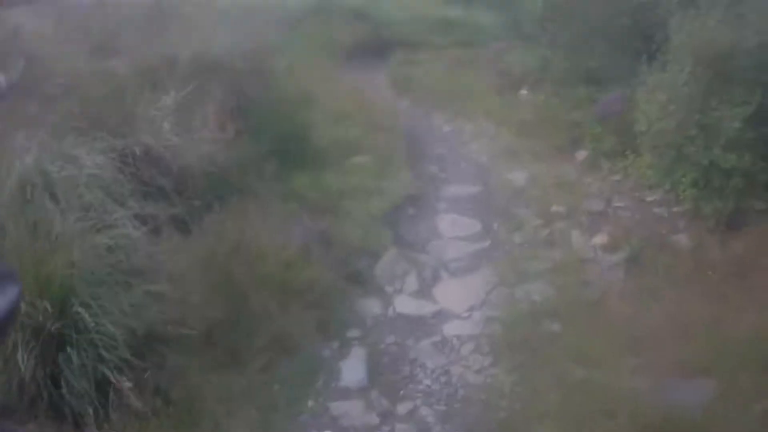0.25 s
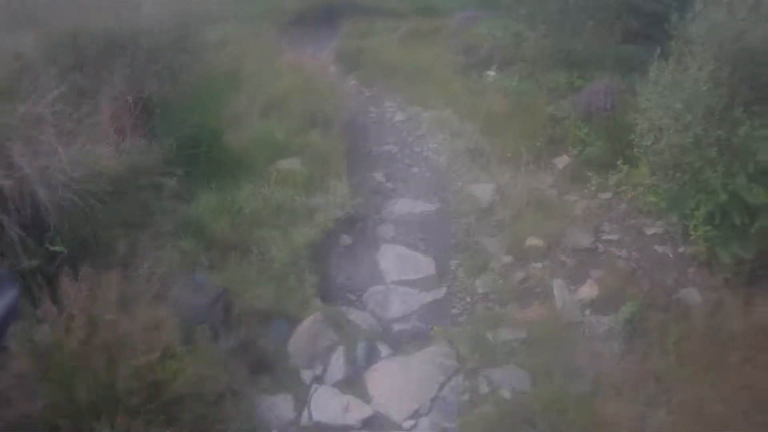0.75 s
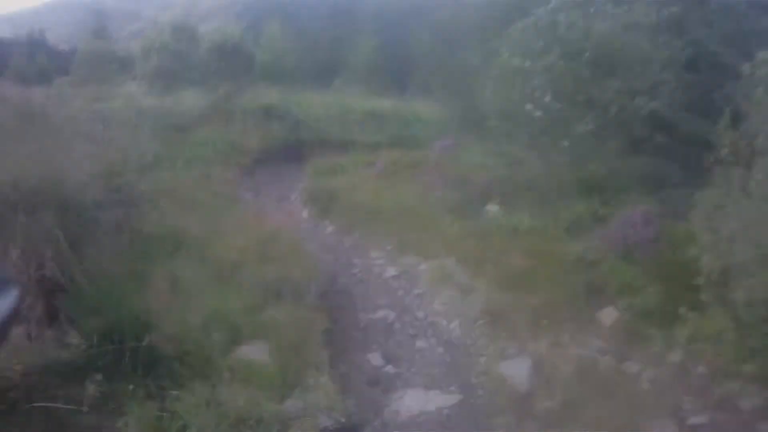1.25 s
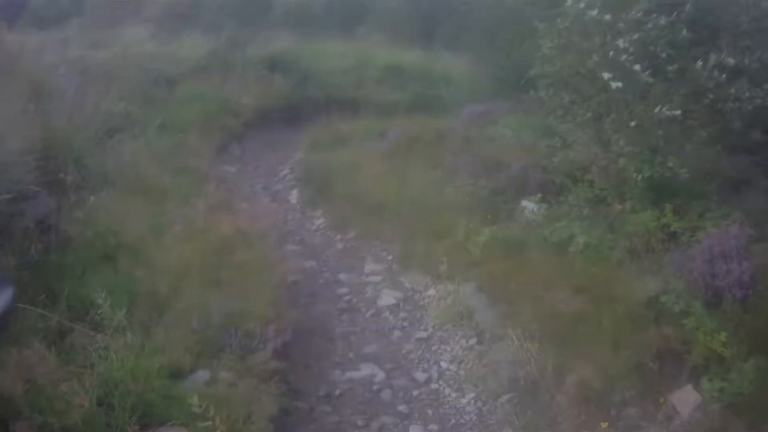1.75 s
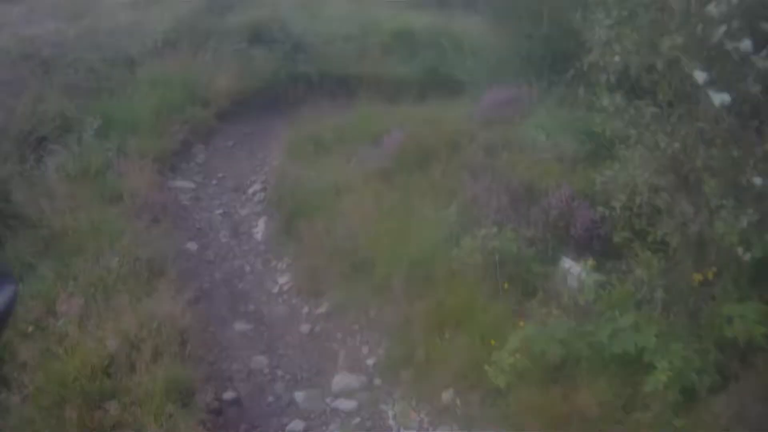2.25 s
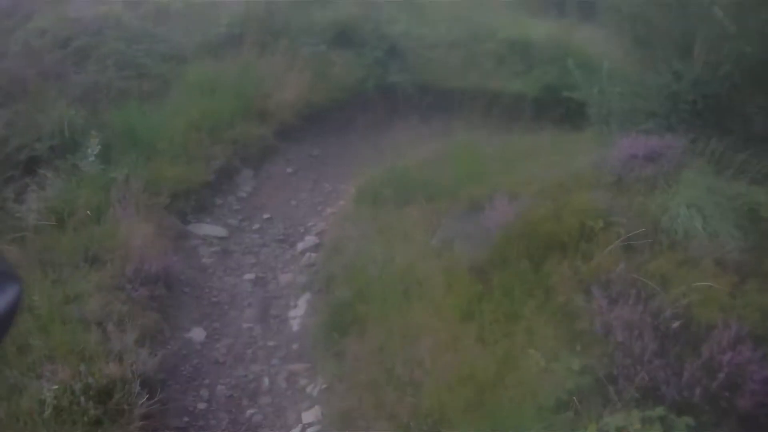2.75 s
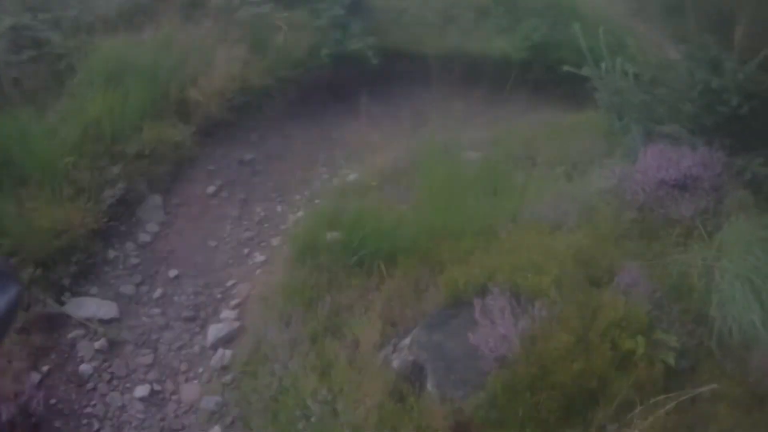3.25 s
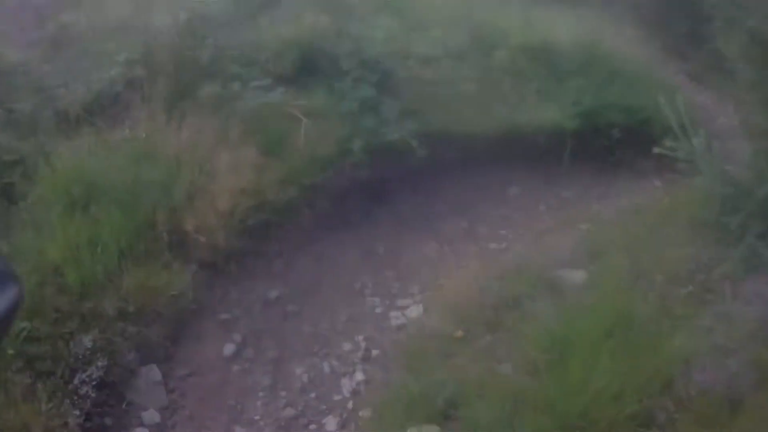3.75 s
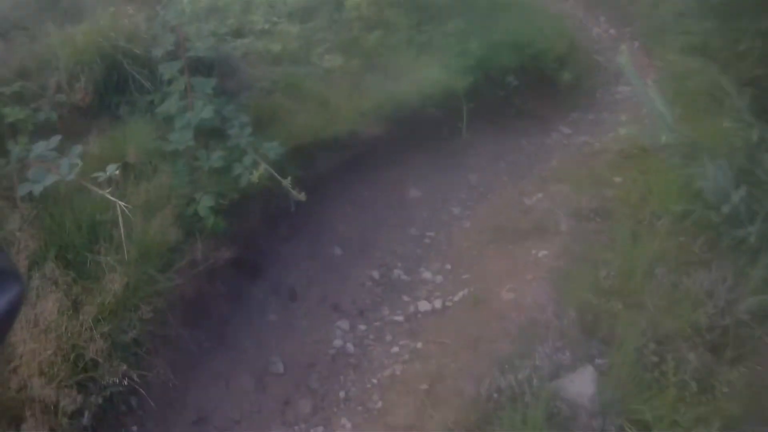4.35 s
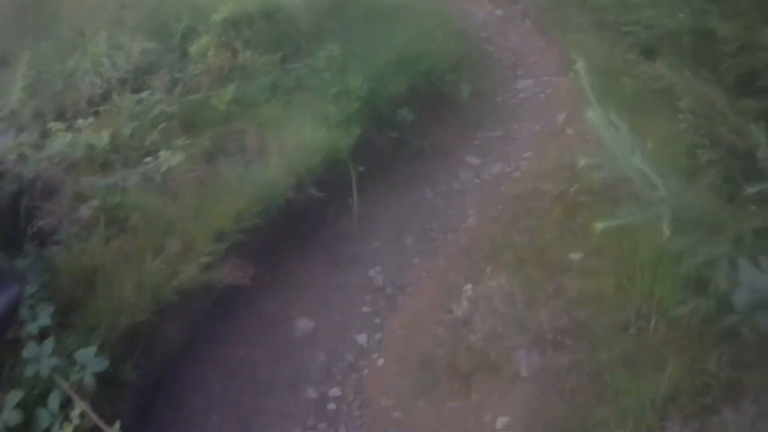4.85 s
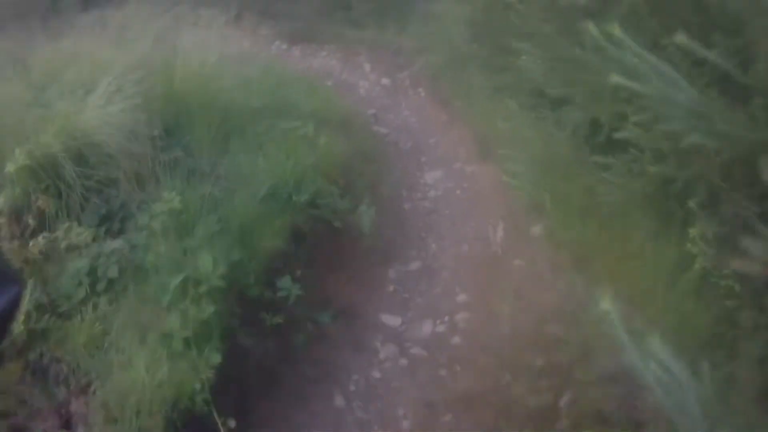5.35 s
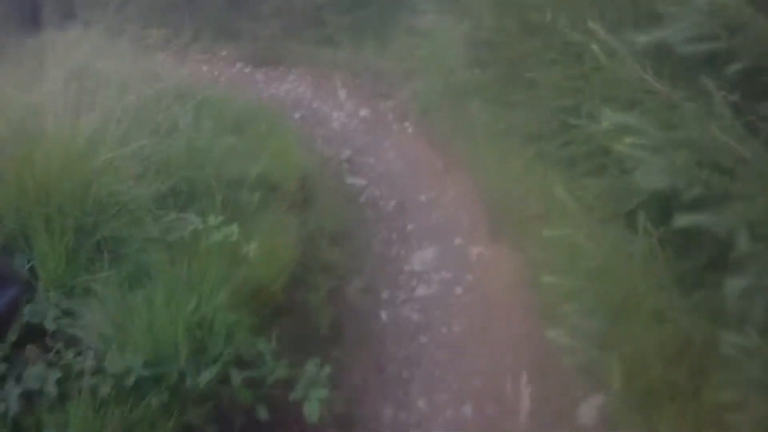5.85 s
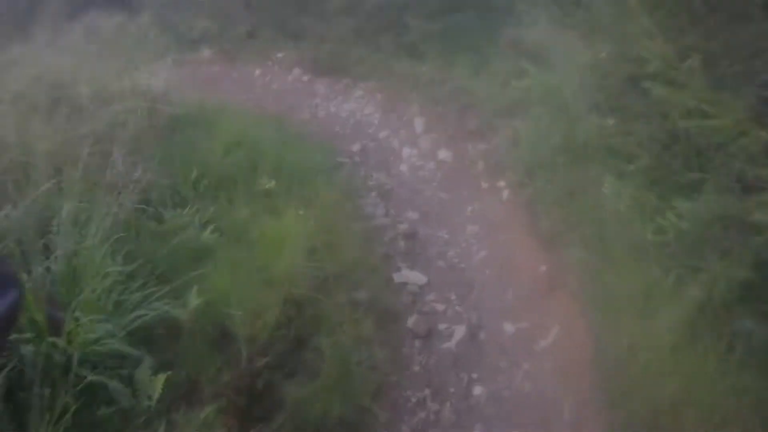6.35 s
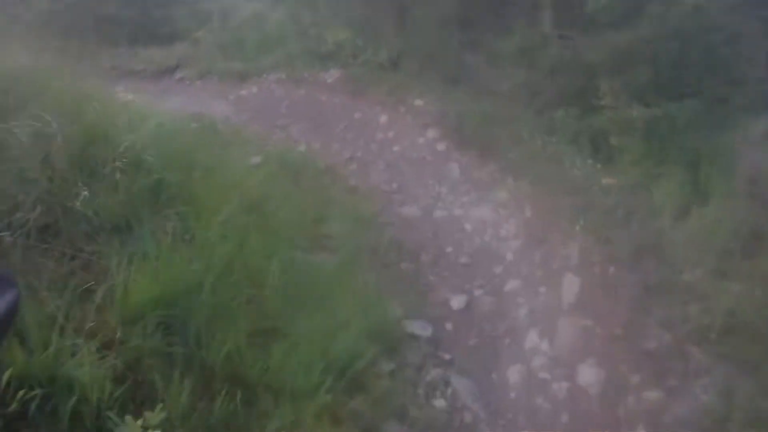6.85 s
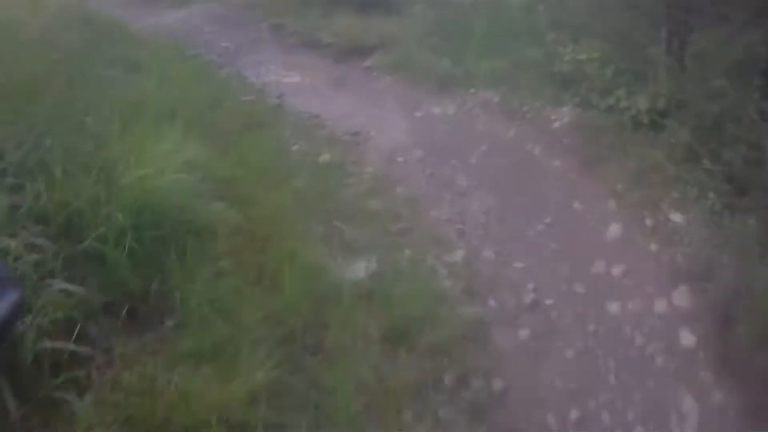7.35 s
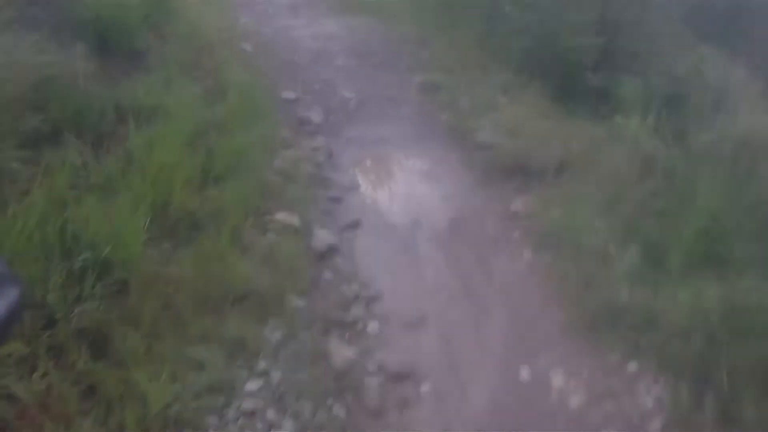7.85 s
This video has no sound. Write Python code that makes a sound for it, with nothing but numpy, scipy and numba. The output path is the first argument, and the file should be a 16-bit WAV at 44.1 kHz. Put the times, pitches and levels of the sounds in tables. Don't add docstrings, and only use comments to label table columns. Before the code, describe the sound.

Riding down a rocky trail, heard on the rider: boxy tyre rumble, sharp stone clacks, and raspy honking brake squeals in three clusters.

```python
import sys
import numpy as np
from scipy import signal
from scipy.fft import rfft, irfft, next_fast_len
from scipy.io import wavfile
from scipy.ndimage import uniform_filter1d
from numba import njit

SR = 44100
rng = np.random.default_rng(int(sys.argv[2]) if len(sys.argv) > 2 else 0)


def wrap_up_sound(samples):
    columns = np.atleast_2d(samples).T
    tamed = np.clip(columns, -1, 1)
    steps = np.round(tamed * 32767).astype(np.int16)
    wavfile.write(sys.argv[1], SR, steps)


def level_to_linear(level):
    exponent = np.asarray(level, float) / 20
    return 10 ** exponent


N = 357033


@njit
def svf(x, hz, width):
    y, band, low = np.empty(len(x)), 0., 0.
    g, k = np.tan(np.pi * hz / SR), width / hz
    for i in range(len(x)):
        v = (band + g * (x[i] - low)) / (1 + g * (g + k))
        band, low, y[i] = 2 * v - band, low + 2 * g * v, k * v
    return y


def unit(x):
    return x / np.sqrt(np.mean(x ** 2))


def noise():
    return rng.standard_normal(N)


def walk(rate):
    hold = int(SR / rate)
    steps = np.repeat(rng.standard_normal(N // hold + 1), hold)
    return unit(uniform_filter1d(uniform_filter1d(steps, hold), hold)[:N])


def follow(points):
    s, *columns = np.transpose(points)
    curves = [np.interp(np.arange(N) / SR, s, column) for column in columns]
    return curves if len(curves) > 1 else curves[0]


def shape(points, hz):
    f, db = np.transpose(points)
    return np.interp(np.log(np.maximum(hz, 1)), np.log(f), db)


def colour(x, points):
    size = next_fast_len(N)
    hz = np.arange(size // 2 + 1) * SR / size
    inside = (hz > points[0][0]) & (hz < points[-1][0])
    return unit(irfft(rfft(x, size) * level_to_linear(shape(points, hz)) * inside, size)[:N])


def grains(rate, spread_db):
    hit, size, sign = rng.random((3, N))
    return (hit < rate / SR) * level_to_linear(-spread_db * np.log(size + 0.01)) * (sign - .5)


def held(rows, rise, fall=None):
    t = np.arange(N) / SR
    levels = []
    for row in rows:
        early, late = np.maximum(row[0] - t, 0), np.maximum(t - row[1], 0)
        levels.append(np.interp(t, row[:2], row[2:4]) - rise * early - (fall or row[4]) * late)
    return uniform_filter1d(np.max(levels, axis=0), size=120), np.argmax(levels, axis=0)


def dips(rows, half_s):
    t = np.arange(N) / SR
    return sum(db * np.maximum(1 - np.abs(t - s) / half_s, 0) for s, db in rows)


def fading(depth, rate):
    return (1 + depth * (walk(rate) + 1j * walk(rate))) / np.sqrt(1 + 2 * depth ** 2)


def mode(pitch, squeezes, octaves, wobble_hz):
    hz = follow(pitch)
    spin = np.exp(2j * np.pi * np.cumsum(hz + wobble_hz * walk(160)) / SR)
    swing = np.sqrt(2) * level_to_linear(held(squeezes, rise=254)[0])
    octave = np.sqrt(2) * level_to_linear(held(octaves, rise=449)[0])
    return hz, swing * spin, octave * spin ** 2 * fading(.6, 90)


# (time [s], pitch [Hz])
LOW_PITCH = [(0, 656.7), (.9, 654.6), (2.55, 654.7), (2.9, 648), (3.2, 650.6), (3.45, 652), (3.76, 661.4),
             (3.9, 662.4), (4.15, 647.6), (4.45, 650), (5.19, 654), (5.4, 651.7), (5.6, 651.4),
             (5.67, 661.5), (5.74, 684), (5.95, 693.6), (6.7, 660), (6.95, 658.5), (7.02, 691), (8.1, 717)]
HIGH_PITCH = [(0, 750), (.74, 758), (.86, 749), (.92, 756), (1.0, 757), (1.3, 754), (1.7, 757), (2.5, 752),
              (6.72, 759), (6.82, 739.5), (6.88, 713), (8.1, 723)]
# (full from [s], let go [s], level at first [dB], level at let-go [dB], dying rate [dB/s])
LOW_SQUEEZES = [(0.683, .7, -40, -41.5, 201), (0.868, 0.87, -37, -38, 330), (2.488, 2.578, -40, -40, 200),
                (2.616, 2.655, -32.5, -30, 70), (2.826, 2.86, -32.5, -31, 200),
                (2.923, 2.964, -32, -30.5, 200), (2.98, 3.06, -34, -40, 100),
                (3.112, 3.215, -36, -35.5, 100), (3.245, 3.394, -31.5, -33, 258),
                (3.5, 3.682, -54, -57, 200), (3.777, 3.82, -26.5, -25, 300), (3.86, 3.972, -29, -30.5, 197),
                (4.0, 4.196, -32.5, -30, 100), (4.2, 4.293, -31, -26.5, 60.5),
                (4.408, 4.454, -26, -27, 397), (4.48, 4.604, -31, -46, 150), (4.65, 4.82, -53, -59, 140),
                (5.144, 5.149, -33, -31.5, 500), (5.254, 5.293, -32.5, -33, 200),
                (5.365, 5.388, -28.5, -29, 200), (5.476, 5.62, -29, -34.5, 200),
                (5.671, 5.721, -25, -30, 500), (5.783, 5.967, -39.5, -52, 200),
                (6.77, 6.82, -33.5, -27, 260), (6.85, 6.946, -28.5, -25, 260), (6.93, 6.96, -29, -31, 900),
                (7.02, 7.098, -35, -43, 200)]
HIGH_SQUEEZES = [
    (0.636, 0.73, -44, -39, 300),
    (0.872, 0.886, -29, -29, 250),
    (0.962, 1.05, -28.5, -31, 200),
    (1.111, 1.134, -30.5, -32.5, 300),
    (1.185, 1.275, -29.5, -35, 400),
    (1.33, 1.348, -39, -40.5, 500),
    (1.62, 1.671, -36, -39.5, 250),
    (2.508, 2.519, -28.5, -30.5, 600),
    (6.787, 6.899, -30, -31.5, 600),
]
# (full from [s], let go [s], level at first [dB], level at let-go [dB], dying rate [dB/s])
LOW_OCTAVES = [(2.54, 2.67, -51.5, -40, 136), (2.798, 2.87, -46, -45, 150), (2.952, 3.4, -51.5, -58, 150),
               (3.785, 3.797, -44, -42, 147), (4.03, 4.2, -55.5, -53, 301), (4.301, 4.43, -61, -43.5, 251),
               (5.135, 5.461, -54.5, -42, 100), (5.492, 5.696, -45.5, -42, 163),
               (6.756, 6.78, -44, -48, 200), (6.823, 6.83, -28, -38, 200), (6.858, 6.903, -42, -38, 200),
               (6.93, 6.979, -45, -46, 600), (5.741, 5.83, -52, -75, 200)]
HIGH_OCTAVES = [
    (0.702, .71, -54, -67, 200),
    (0.872, 1.202, -50.5, -43, 79),
    (1.605, 1.7, -60, -67, 200),
    (2.5, 2.508, -57, -58, 300),
    (6.79, 6.898, -51, -44, 600),
]
# (time [s], depth [dB])
LOW_FADES = [(2.745, -14), (2.884, -15), (2.925, -5), (2.965, -6), (2.99, -6), (3.275, -5.5), (3.32, -5),
             (3.797, -11.5), (3.836, -12), (3.95, -4), (3.985, -13), (4.015, -16), (4.473, -11),
             (4.512, -8.5), (4.545, -13), (5.325, -5), (5.395, -9), (5.436, -10), (5.495, -7), (5.63, -8),
             (5.75, -9), (5.81, -12), (5.865, -8), (5.91, -11), (6.826, -10), (6.895, -5), (6.95, -11.5),
             (7.011, -10), (7.05, -3), (7.088, -10)]
HIGH_FADES = [
    (1.153, -2),
    (1.237, -5),
    (1.287, -8),
]
# (time [s], share [0-1])
STEERING = [(0, 1), (1.8, 1), (2.48, 0.17), (2.525, 0.02), (2.545, 0), (6.7, 0), (6.78, 0.1), (6.81, 0.7),
            (6.825, 0)]
# (time [s], roughness [0-1])
ROUGHNESS = [(1.5, .15), (2.5, .3), (3.1, .22), (3.75, .45), (4.0, .45), (4.06, .15), (4.45, .2),
             (5.25, .25), (5.33, .55), (5.5, .55), (5.58, .35), (5.65, .45), (5.68, .7), (5.73, .4),
             (6.8, .75), (6.9, .7), (6.96, .45)]
# (full from [s], slip [s], level at first [dB], level at slip [dB],
# lift of overtones away from the case whistle [dB])
GRABS = [(0.671, 0.69, -45.5, -43.5, -5), (0.864, 0.88, -34.5, -30.5, -5), (0.903, 1.14, -45, -43, 5.5),
         (1.165, 1.28, -40.5, -41, 2.5), (1.292, 1.326, -35, -40, -9), (1.353, 1.37, -58, -50.5, -9),
         (2.489, 2.64, -32.5, -27.5, -5), (2.6, 3.007, -31, -33, -2.5), (3.022, 3.306, -33, -37.5, -3.5),
         (3.336, 3.4, -48, -58, 0.5), (3.771, 3.78, -34, -38.5, -1.5), (3.82, 3.83, -27.5, -39.5, -5),
         (3.855, 3.89, -41, -41, -2), (3.936, 3.953, -63, -46, -4), (4.024, 4.095, -41, -32.5, -4),
         (4.068, 4.335, -34, -32, -5.5), (4.339, 4.43, -33, -44, -3), (5.12, 5.05, -62, -50, -5),
         (5.193, 5.32, -30, -27, -6), (5.31, 5.47, -32.5, -34, -4.5), (5.465, 5.5, -39, -37.5, -3),
         (5.489, 5.646, -34, -32.5, -2.5), (5.672, 5.65, -39, -41, 2), (5.7, 5.715, -48, -52, -6),
         (6.789, 6.795, -24, -26, -5), (6.805, 6.816, -27, -29, -4.5), (6.833, 6.873, -27, -27.5, -3),
         (6.912, 6.906, -33, -35, -2)]
# (time [s], depth [dB])
BUMPS = [
    (.97, -11),
    (1.035, -7),
    (2.662, -16.5),
    (2.838, -7),
]
# (from [s], to [s], rasp loss at first [dB], rasp loss at end [dB])
CLEAN_ROTOR = [
    (3.08, 3.33, 13, 11),
    (4.07, 4.33, 14, 11),
    (5.2, 5.28, 8, 15),
    (5.55, 5.64, 4, 3),
]
# (time [s], lift below the case whistle [dB], lift of the top [dB])
BAR_AIM = [(.87, 1.5, -3), (1.0, -0.5, -2), (1.2, 1, -0.5), (2.5, -3.5, 2), (2.62, -0.5, 0.5), (2.8, -1, 1),
           (2.95, -2, 2.5), (3.12, -8.5, 1.5), (3.25, 1.5, 0), (3.8, 0.5, -1), (4.05, 1.5, 0), (4.25, 0, 0),
           (4.4, 1, 0), (5.22, -1.5, 1.5), (5.4, 1, 2), (5.62, 0, 4), (6.8, -2, 0), (6.9, 2, -1)]
# (frequency [Hz], level [dB])
SLIP_COLOUR = [(1950, -7.5), (2270, -5), (2600, -4), (2850, 3.5), (3020, 2.5), (3250, -2), (3560, -12.5),
               (3900, -9.5), (4550, -17.5), (5200, -13), (5900, -19.5), (7000, -16.5), (8000, -26.5),
               (9500, -39), (12500, -51)]
# (frequency [Hz], level [dB])
RASP_COLOUR = [(900, -3.5), (1300, -14), (1750, 2.5), (2200, -9), (2600, -8.5), (2950, 11.5), (3500, -4.5),
               (5000, -9), (7000, -11), (10000, -29), (15000, -49)]


def brakes():
    rough = follow(ROUGHNESS)
    low_hz, low, low_octave = mode(LOW_PITCH, LOW_SQUEEZES, LOW_OCTAVES, wobble_hz=1.5 + 9 * rough ** 2)
    high_hz, high, high_octave = mode(HIGH_PITCH, HIGH_SQUEEZES, HIGH_OCTAVES, wobble_hz=1.5)

    steer = high * np.clip(follow(STEERING), 0, 1)
    pad = low + steer
    pointer = pad / (np.abs(pad) + 1e-12)
    reach = np.abs(low) + np.abs(steer) + 1e-9
    slip_hz = (np.abs(low) * low_hz + np.abs(steer) * high_hz + 1e-6) / reach
    beat = (np.abs(pad) / reach) ** .9

    bite_db, grab = held(GRABS, rise=2200, fall=600)
    bite_db = bite_db + dips(BUMPS, half_s=0.02)
    bright_db = uniform_filter1d(1. * np.array(GRABS)[grab, -1], size=800)
    below_db, top_db = follow(BAR_AIM)
    slips = 0
    for k in range(3, 20):
        hz = k * slip_hz
        db = shape(SLIP_COLOUR, hz[::64]).repeat(64)[:N]
        db = db + bright_db * np.minimum(np.abs(hz - 3150) / 1500, 1.6)
        db = db + below_db * (k < 5) + top_db * np.clip((hz - 5000) / 4000, 0, 1.5)
        near_case = .15 if k == 5 else 1
        shaking = fading((.1 + .5 * rough) * np.sqrt(near_case), 120)
        turning = fading(.55 * near_case, 32)
        overtone = pointer ** k * np.exp(.8j * k * k)
        slips = slips + level_to_linear(db) * (overtone * shaking * turning).real
    stutter = level_to_linear(5 * rough * walk(130))

    clean_db = np.maximum(held(CLEAN_ROTOR, rise=121, fall=121)[0], 0)
    rasp = colour(noise() * (1 + 0.26 * pointer.real), RASP_COLOUR)
    rasp = rasp * level_to_linear(-16.5 + 7 * rough - clean_db + 2 * walk(60))

    low_tone = low * level_to_linear(dips(LOW_FADES, half_s=0.0141))
    low_tone = low_tone * fading(1.1 * rough ** 2, 170) * fading(.25 * rough, 40)
    high_tone = high * level_to_linear(dips(HIGH_FADES, half_s=0.02)) * fading(.06 + .8 * rough ** 2, 90)
    tones = low_tone + high_tone + low_octave + high_octave
    return tones.real + level_to_linear(bite_db) * beat * stutter * (slips + rasp)


# (time [s], rock under the wheels [dB], loose grit [dB])
GROUND = [(0.0, -5.5, -3.5), (.55, 5.5, -3.5), (1.06, 10, 1.5), (1.5, 6.5, -0.5), (1.71, 2, -2),
          (2.34, 5, -2.5), (2.66, 2, 1.5), (3.07, 5, -1.5), (3.4, 0, -3), (3.48, -4.5, -1.5),
          (3.88, 0, -0.5), (4.9, -14, -4.5), (5.28, -7, -1), (5.5, -12, 2.5), (6.02, -9, -3),
          (6.11, -2, -1), (7.1, -0.5, 3.5), (8.1, -6, -0.6)]
# (frequency [Hz], level [dB per Hz])
RUMBLE_COLOUR = [(12, -63.5), (20, -18), (37, -4.5), (97, -2.5), (259, -3.5), (332, -6), (412, -6),
                 (520, -8), (680, -27.5), (1140, -120)]
# (frequency [Hz], level [dB])
TREAD_COLOUR = [(300, -16), (500, -4.5), (700, 5), (950, -6), (1200, -16), (1600, -16.5)]
# (frequency [Hz], level [dB per Hz])
GRIT_COLOUR = [(710, -39), (1200, -16), (1340, -14), (1410, -12.5), (1650, 3), (1980, 0), (2120, -4),
               (2860, -0.5), (5370, -10), (6580, -5.5), (7480, -13.5), (11400, -15.5), (15500, -21.5)]
# (from [s], to [s], lift at first [dB], lift at end [dB])
STONE_BEDS = [
    (6.68, 6.76, -5, 7),
    (7.0, 7.25, 7, 2),
    (7.32, 7.38, 4, 8.5),
    (7.535, 7.64, 10.5, 14.5),
    (7.95, 8.04, 7, 13.5),
]


def rolling():
    rock, loose = follow(GROUND)
    grit_db = -62 + loose
    tread_db = -52 + 0.35 * rock + loose
    rumble = colour(noise(), RUMBLE_COLOUR) * level_to_linear(-56 + rock + 2.5 * walk(18))
    tread = colour(noise() + 1.2 * grains(340, 2.1), TREAD_COLOUR) * level_to_linear(tread_db + 2.7 * walk(30))
    grit = colour(noise() + 8. * grains(300, 2.2), GRIT_COLOUR) * level_to_linear(grit_db + 1.2 * walk(60))
    bed_db = np.maximum(held(STONE_BEDS, rise=300, fall=300)[0], 0)
    patches = level_to_linear(4.0 * walk(70) + bed_db)
    crunch = unit(svf(noise() + 6. * grains(440, 6.4), 2900.0, 450.))
    return rumble + tread + grit + crunch * level_to_linear(grit_db - 4) * patches


# (time [s], clack level [dB], tick over it [dB], thud over it [dB], fizz over it [dB])
STONES = [(0.348, -28, -5, -3.5, -5), (0.3547, -22.5, 4, -11, -11), (0.358, -28, 10, -4, 13),
          (1.05, -35, 6, -7, 13), (1.153, -23, 6, -10, 8), (0.464, -44, -9, -15, -15),
          (1.626, -44, 4.5, -12, 5), (1.796, -45, 2, -14, 6), (2.047, -26, 7, -9, -10),
          (2.127, -50, 4, -9, 7), (2.262, -23, 3, -7.5, -12), (2.327, -44, 2, -20, -2),
          (3.786, -31.5, 6, -5, -1), (3.889, -29, -14, -7, -30), (5.882, -31.5, -7, -0.5, -14),
          (5.925, -38, -13, -14, -9), (6.012, -39, -2, -5.5, -4), (6.234, -34.5, -7, -12, -11),
          (6.525, -26.5, 11, -15, 9.5), (6.562, -32, -15.5, -19, -18), (7.413, -22, 16, -25, 18),
          (7.608, -36, 10, -6, 18), (7.677, -23, -3, -2, -17), (7.818, -31, -16, -13, -14),
          (7.929, -34, 4, -7.5, -20), (0.377, -52, 5, -20, 8), (7.686, -42, 8, -20, 0)]
# (time [s], clack level [dB])
CHAIN_RATTLES = [(1.729, -43), (1.535, -46), (6.5, -36), (7.162, -41), (7.391, -41), (7.8, -41),
                 (3.56, -46.5), (7.047, -46), (7.56, -39), (8.015, -44), (0.2, -50), (0.111, -52)]
# (time [s], thud level [dB], pitch [Hz], clack relative to it [dB])
CASE_THUDS = [(1.388, -29.5, 856, -11), (1.468, -31, 780, -0.5), (1.81, -38.5, 884, -14),
              (1.82, -30.5, 844, -18), (1.876, -27.5, 785, -20), (6.11, -40, 953, -8),
              (6.79, -26.5, 714, -2), (7.476, -31.5, 690, -27), (7.53, -41, 750, -25),
              (7.639, -31, 706, -16), (7.688, -21.5, 627, -16), (7.701, -32, 740, 1.5)]
# (frequency [Hz], width [Hz], level [dB])
RINGING_PARTS = [
    [(1660, 780, -1), (2160, 1050, -1), (2770, 830, 2)],
    [(4830, 1670, 3.5)],
    [(6600, 2400, -3.5), (9240, 4800, -10.5)],
]


def knocks():
    boom_hz, delay_s = 730, .001
    hits = [(s, db, 0, tick, fizz, thud, boom_hz) for s, db, tick, thud, fizz in STONES]
    hits += [(s, db, 0, -1.5, -1.5, -7, boom_hz) for s, db in CHAIN_RATTLES]
    hits += [(s, db, clack, clack - 27, clack - 27, 0, hz) for s, db, hz, clack in CASE_THUDS]

    out, push, t = np.zeros(N + 2048), np.arange(384), np.arange(2048) / SR
    dying = np.exp(-push / 45.0) * 0.18 + np.exp(-push / 120.0) * 0.034
    rough = rng.standard_normal((len(hits), len(push))) * dying
    rough[:, 0] = 1
    for part, resonances in enumerate(RINGING_PARTS):
        blows = np.zeros(N + 2048)
        for hit, burst in zip(hits, rough):
            at = int((hit[0] + delay_s) * SR)
            blows[at:at + len(push)] += level_to_linear(hit[1] + hit[2 + part]) * burst
        for hz, width, db in resonances:
            ringing = svf(svf(blows + 1e-18, 1. * hz, 1. * width), 1. * hz, 2. * width)
            out += level_to_linear(db + 11.5) * np.sqrt(4000 / width) * ringing
    for s, peak_db, _, _, _, thud_db, hz in hits:
        thud = t / 0.0027 * np.exp(1 - t / 0.0015) * np.sin(2 * np.pi * hz * t)
        out[int((s + delay_s) * SR):][:len(t)] += level_to_linear(peak_db + thud_db + 8.0) * thud
    case = signal.butter(2, 11900, fs=SR, output="sos")
    return signal.sosfilt(case, out[:N])


# (time [s], length [s], level [dB], centre [Hz])
RUBS = [(.15, .015, -54, 2000), (0.239, 0.032, -56, 3050), (.595, .012, -62, 6500),
        (1.032, .012, -56, 8000), (1.445, 0.028, -48, 2580), (1.452, 0.014, -55, 6700),
        (1.595, .015, -58, 6200), (1.765, .035, -57, 3680), (1.77, .025, -63, 7000),
        (1.876, 0.031, -56, 3900), (3.946, 0.01, -60, 7400), (4.602, .03, -61, 2500),
        (5.9, 0.063, -63.5, 6500), (6.93, 0.032, -46, 2800), (5.66, .035, -54, 5500),
        (1.043, .02, -50, 2800), (6.0, .02, -58, 5500), (6.106, .018, -52, 5460), (6.104, 0.02, -49, 2770),
        (6.155, .012, -60, 6502), (6.196, .015, -60, 6000), (6.215, .05, -53.5, 2800),
        (6.386, .02, -53.5, 3000), (6.394, .03, -60, 6760), (6.48, .015, -56, 2900),
        (6.805, 0.038, -38, 1200), (6.8, .1, -38, 600), (7.085, .012, -50, 4500), (7.355, .02, -52, 3000),
        (7.19, .015, -55, 6000), (7.55, 0.095, -60, 6500), (7.818, 0.032, -61.5, 6804)]


def scuffs():
    out = np.zeros(N)
    for s, length, db, hz in RUBS:
        unevenness = level_to_linear(3.5 * np.repeat(rng.standard_normal(64), 64))
        rub = rng.standard_normal(4096) * unevenness
        n = min(int(length * SR), 4096)
        width = .3 * hz
        rub = svf(svf(rub[:n], 1. * hz, width), 1. * hz, 2 * width)
        out[int(s * SR):][:n] += level_to_linear(db) * unit(rub) * np.sqrt(np.hanning(n))
    return out


# (from [s], to [s], level at first [dB], level at end [dB])
COASTING = [
    (5.75, 6.1, -68, -66),
    (6.18, 6.5, -56, -57),
    (6.55, 6.75, -61, -61),
    (7.0, 7.35, -64, -66),
    (7.45, 8.1, -66, -68),
]


def freewheel():
    count_zero_s, every_s, tick_hz = 6.3035, .0149, 9000.
    k = np.arange(-40, 120)
    late, strong = rng.standard_normal((len(k), 2)).T
    at = ((count_zero_s + k * every_s + .0006 * late) * SR).astype(int)
    ticks = np.zeros(N)
    ticks[at] = level_to_linear(14 + 3 * strong)
    ringing = svf(svf(ticks + 1e-18, tick_hz, 5000.), tick_hz, 8000.)
    return ringing * level_to_linear(held(COASTING, rise=300, fall=300)[0])


# (time [s], length [s], first pitch [Hz], last pitch [Hz], level [dB])
WHISTLES = [
    (2.39, 0.039, 7950, 8080, -65),
    (2.422, 0.038, 7900, 7550, -63),
    (4.88, 0.063, 6600, 5650, -68),
    (4.93, 0.11, 5650, 5800, -71),
    (5.13, 0.025, 6600, 6030, -64),
    (8.0, 0.04, 6400, 7200, -59),
]


def birds():
    out, flutter = np.zeros(N), level_to_linear(2.3 * walk(97))
    for s, length, first_hz, last_hz, db in WHISTLES:
        n = min(int(length * SR), N - int(s * SR))
        tone = np.sin(2 * np.pi * np.cumsum(np.linspace(first_hz, last_hz, n)) / SR)
        out[int(s * SR):][:n] += level_to_linear(db) * np.hanning(n) * tone
    return out * flutter


SKIPPED_PUFFS = [4, 16, 18, 20, 23, 31, 39, 48, 55, 60, 66, 71, 78]


def circuit():
    count_zero_s, every_s, half_s = .024, .1, .009
    turns = (np.arange(N) / SR - count_zero_s) / every_s
    k = np.round(turns).astype(int)
    on = ~np.isin(np.arange(k.max() + 1), SKIPPED_PUFFS)
    puff = on[k] * np.exp(-.5 * ((turns - k) * every_s / half_s) ** 2)
    return colour(noise(), [(10500, -9), (12500, -0.5), (14600, -5)]) * level_to_linear(-73.5) * puff


def microphone_hiss():
    return colour(noise(), [(2000, 2), (15400, -23.0)]) * level_to_linear(-103.5)


def scene():
    top = signal.ellip(10, .2, 60, 15250, fs=SR, output="sos")
    bike = signal.sosfilt(top, brakes() + rolling())
    return (bike + knocks() + scuffs() + freewheel() + birds())[None]


def low_pass(x):
    return signal.sosfilt(signal.butter(12, 16480, fs=SR, output="sos"), x)


def record(dry):
    mix = dry + microphone_hiss() + circuit()
    return low_pass(mix)


dry = scene()
out = record(dry)
wrap_up_sound(out)
```